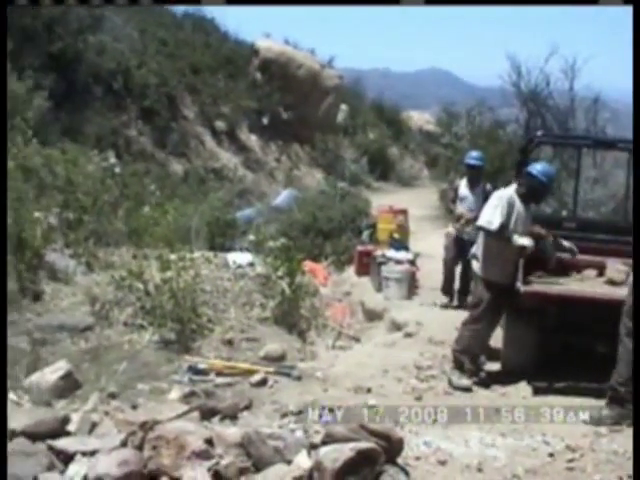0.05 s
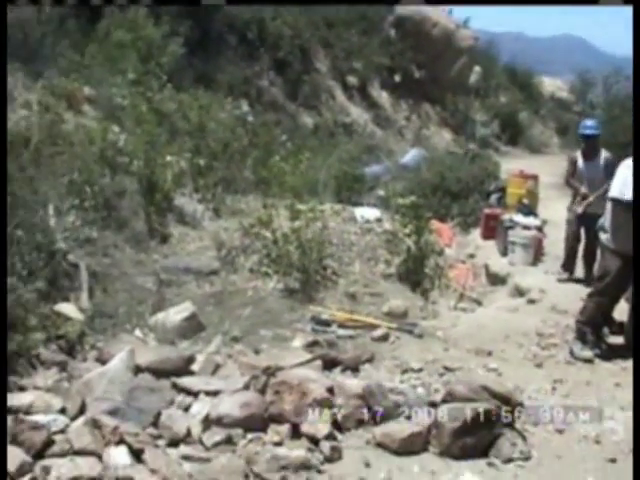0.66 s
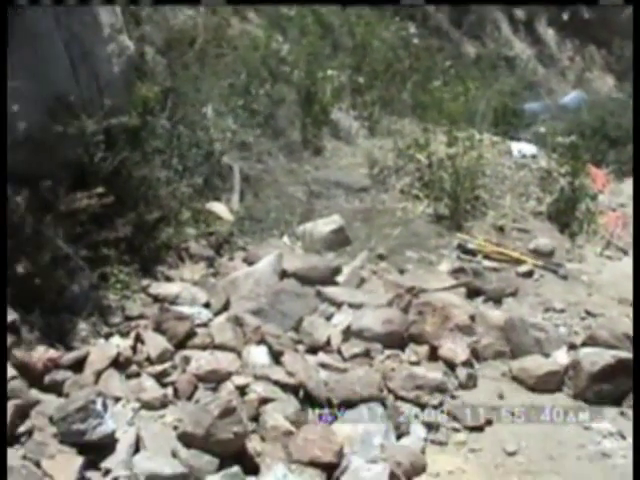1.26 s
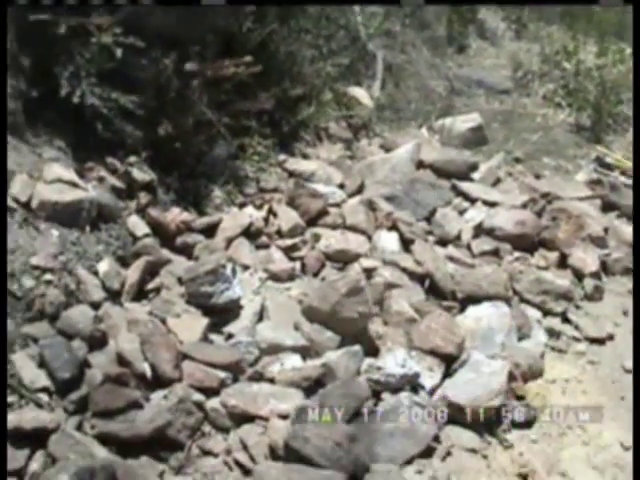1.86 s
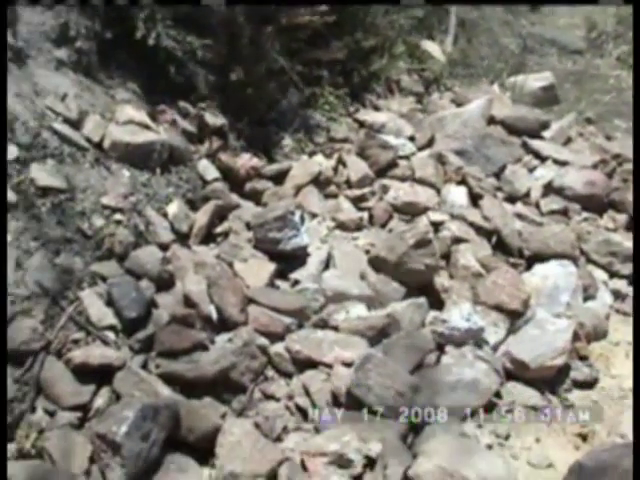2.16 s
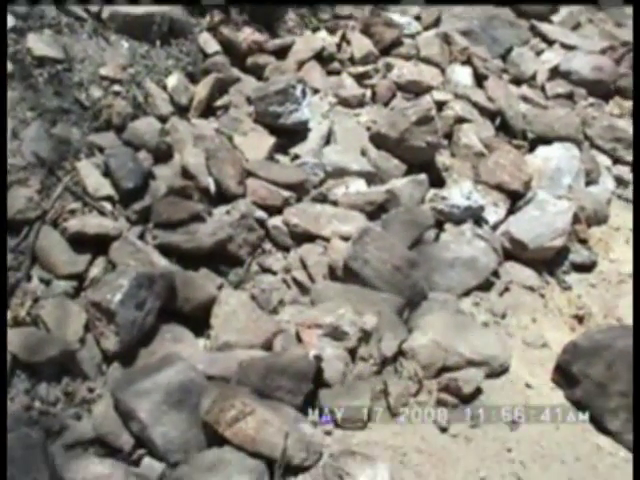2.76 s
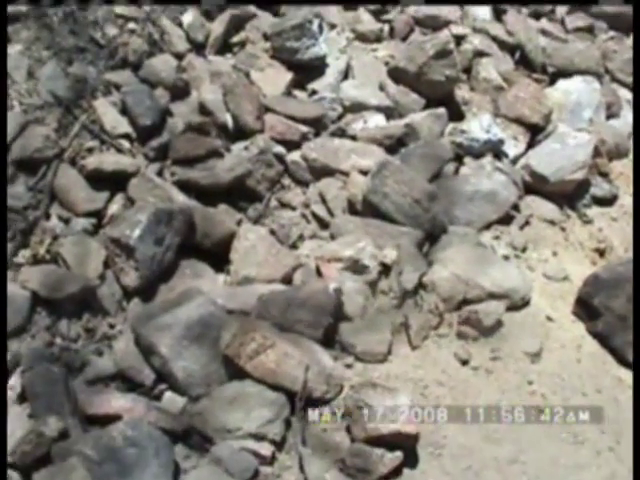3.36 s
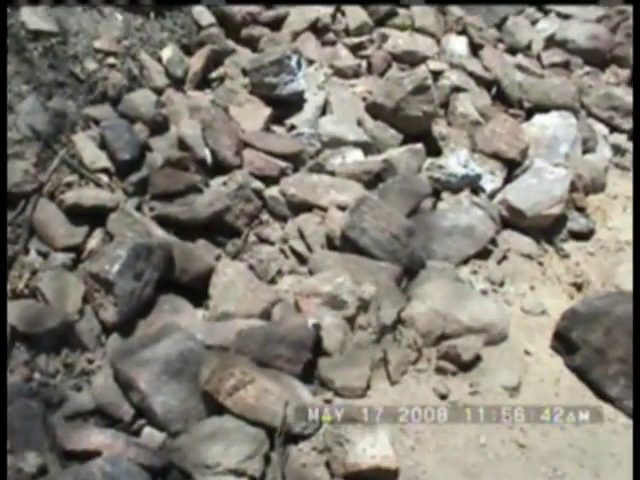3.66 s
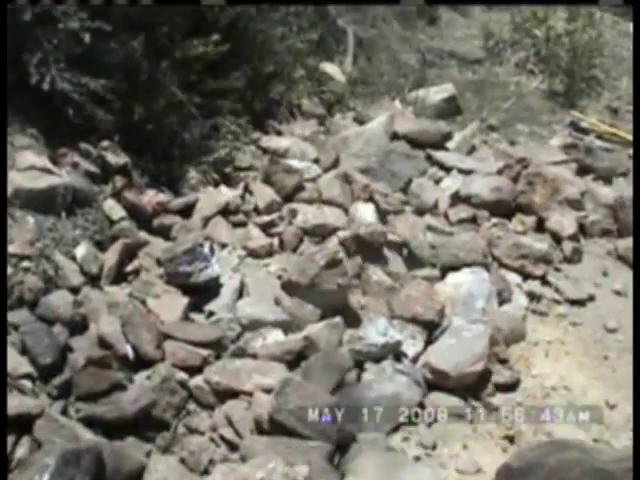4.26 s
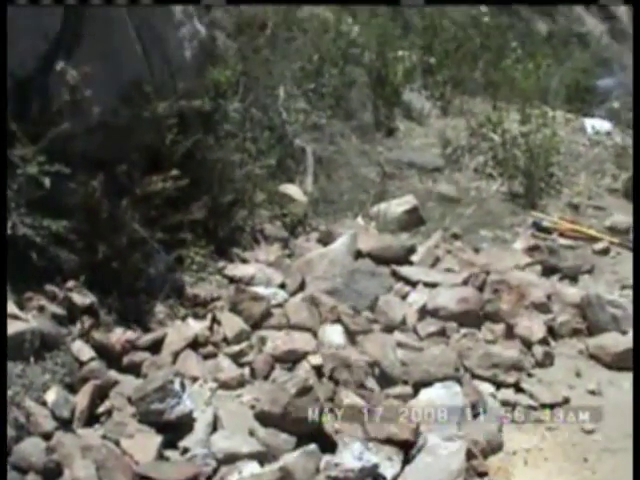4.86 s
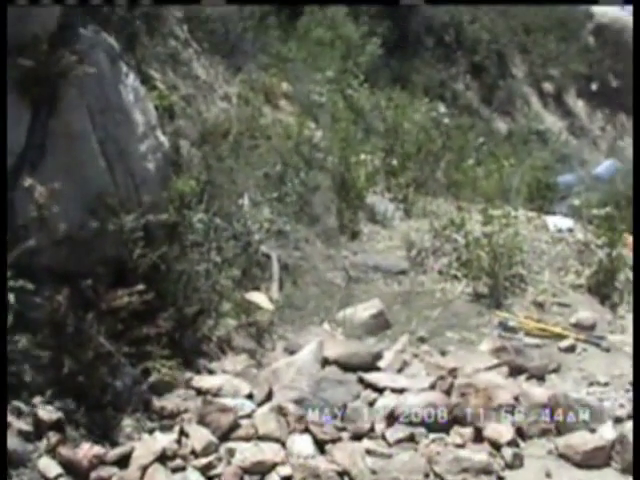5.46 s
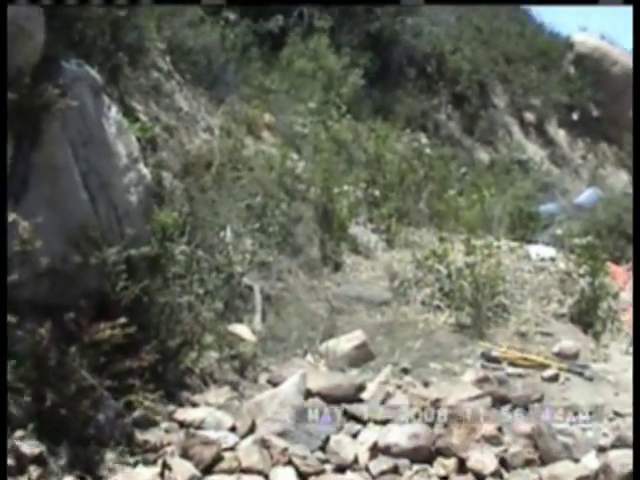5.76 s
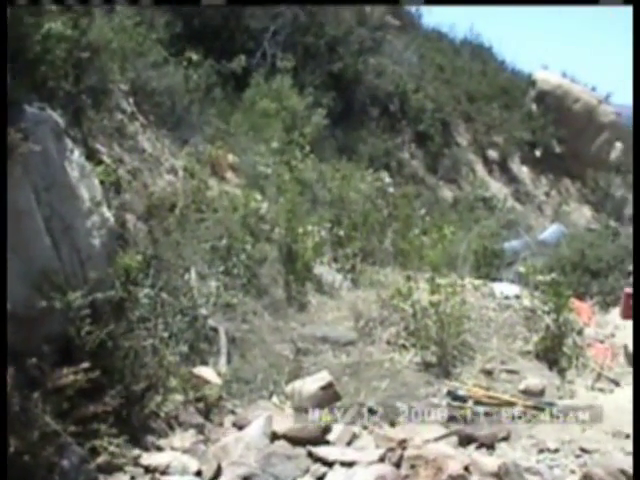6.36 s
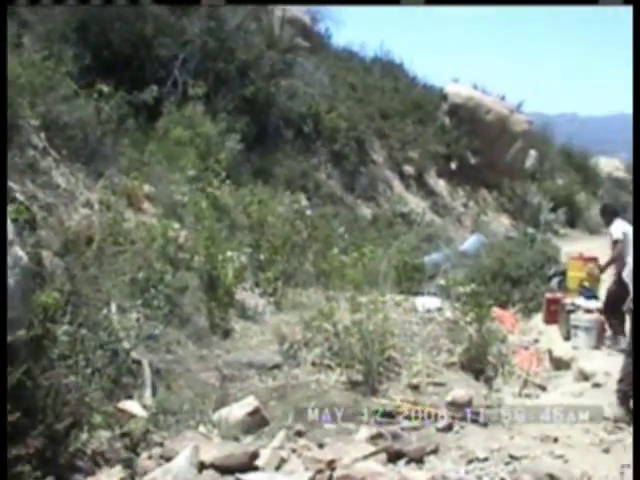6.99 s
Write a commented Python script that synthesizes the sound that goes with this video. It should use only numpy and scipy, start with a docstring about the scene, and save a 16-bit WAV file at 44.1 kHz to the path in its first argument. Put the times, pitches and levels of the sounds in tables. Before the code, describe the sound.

Close to the microphone on a dry trail, tossed stones clatter onto a pile and settle with trickling grit. Boots and heavy rocks scuff and bump in the dirt for a couple of seconds. After a short scrape, stones clack together again in uneven clusters, a few with a brief hollow ring, before softer crunching closes it out. Light wind rumbles on and off.

```python
"""A dry hillside trail, where a crew unloads rocks by hand close to the microphone.
Tossed stones clack on the pile: each impact excites heavily damped modes and cracks the grit.
Heavy rocks and boots thud and scuff in the dirt, and loose stones rub and trickle, their many
tiny contacts summing to noise. A brief hollow ringing follows some bumps and knocks.
Gusts buffet the microphone, faint whistles come and go, and the slope reflects a thin tail."""
import sys
import numpy as np
from scipy import signal
from scipy.fft import rfft, irfft, next_fast_len
from scipy.io import wavfile
from scipy.ndimage import uniform_filter1d

SR = 44100
rng = np.random.default_rng(int(sys.argv[2]) if len(sys.argv) > 2 else 0)


def generate_wav(sig):
    """Save sig (samples, or channels by samples) to the path in sys.argv[1] as 16-bit PCM at SR."""
    pcm = np.round(np.clip(np.atleast_2d(sig).T, -1, 1) * 32767).astype(np.int16)
    wavfile.write(sys.argv[1], SR, pcm)


N = 310023
TIME = np.arange(N) / SR

# Noise spectra. Each row: frequency in Hz, relative spectral density in dB.
AIR_SPECTRUM = [(40, 11), (200, -13), (700, -1), (1500, -5.5), (9000, -15), (13000, -22), (14000, -45)]  # steady hillside air
BUFFET_SPECTRUM = [(15, -34), (35, -7), (70, 1), (140, 1), (240, -5.5), (400, -15), (900, -32), (3000, -77)]  # eddies on the microphone
RUB_SPECTRUM = [(60, -37), (140, -1), (270, 9.5), (450, 6), (650, 6.5), (1400, 3), (2000, -5), (3500, -30),
                (9000, -64)]  # loose stones rubbing
TRICKLE_SPECTRUM = [(1200, 10.5), (2200, 6.5), (5000, 3), (10500, 0), (13000, -11), (14200, -22)]  # grit running between stones
SAND_SPECTRUM = [(3000, 1.5), (6300, -1.5), (7600, 3.5), (8600, -0.5), (10000, -6.5), (13000, -38)]  # crushed sand
CHIP_SPECTRUM = [(2100, 7), (3800, -14), (5200, 3), (7500, -2), (15000, -16)]  # skittering chips
GRIND_SPECTRUM = [(120, -4), (500, -8.5), (1050, -6), (1500, 1), (1900, -4.5), (2500, -11), (8000, -16.5),
                  (15000, -40)]  # rock rasping on rock
GRIT_SPECTRUM = [(700, 14), (1800, 9.5), (3500, 9), (6000, 13.5), (9000, 14), (12500, -2), (16000, -21)]  # crunching gravel
CRACK_SPECTRUM = [(1200, 7.5), (2200, 4), (3600, 0), (7000, -4), (10000, -8.5), (13000, -20.5),
                  (16000, -49)]  # the sharp edge of an impact
# Spectrum of a scuff's dull body. Each row: multiple of its pitch, relative density in dB.
DIRT_SPECTRUM = [(.1, -19.5), (.28, -9), (.4, 2), (.7, -1), (1.0, 2), (1.65, -3), (2.2, -8), (6.0, -27),
                 (14.0, -73)]
# Reverberation of the slope. Each row: frequency in Hz, time to fall 60 dB in seconds.
SLOPE_DECAY = [(200, 0.88), (1000, 0.19), (4000, 0.23), (9000, 0.17), (15000, 0.27)]
# Gusts. Each row: start in seconds, length in seconds, relative level in dB.
GUSTS = [(-.02, 0.088, -27.5), (0.142, 0.14, -29), (1.972, 0.058, -38), (2.904, 0.078, -36.5),
         (3.091, 0.25, -28), (3.346, 0.1, -27.5), (3.959, 0.29, -29.5), (4.31, 0.36, -30.5),
         (4.555, 0.38, -30.5), (4.962, 0.236, -38.5), (5.477, 0.315, -36), (5.853, 0.13, -26),
         (6.501, 0.052, -31), (6.76, 0.066, -25), (6.873, 0.098, -29)]
# A tiny squeak and an airy whistle. Each row: start and length in seconds, pitch and width in Hz,
# level in dB.
WHISTLES = [(2.214, 0.0087, 10500, 463, -40), (5.794, 0.95, 2180, 170, -49)]
# Loose stones sliding. Each row: start and length in seconds, relative rubbing and grit levels in dB.
SLIDES = [(-.03, 0.093, -44, -45), (0.132, 0.4, -65, -43.5), (0.362, 0.36, -45.5, -47.5),
          (1.165, 0.35, -37.5, -46.5), (1.564, 0.21, -35.5, -50.5), (1.82, 0.34, -35, -46),
          (2.196, 0.16, -40, -58), (2.36, 0.25, -34, -54), (2.762, 0.7, -46, -54.5),
          (3.604, 0.091, -43.5, -52), (4.308, 0.11, -34, -43), (4.566, 0.18, -42, -43.5),
          (4.747, 0.17, -58, -47.5), (5.217, 0.093, -40, -39.5), (5.332, 0.017, -22.5, -37.5),
          (5.479, 0.2, -33, -44.5), (5.798, 0.23, -36.5, -49), (6.06, 0.79, -43, -55),
          (6.656, 0.37, -32, -42)]
# Sand yielding under a weight. Each row: start in seconds, level in dB.
CRUNCHES = [(1.22, -36), (1.398, -40), (1.457, -46), (6.791, -39), (6.835, -34.5), (6.905, -36)]
# Low bumps. Each row: start in seconds, envelope peak in dB, pitch in Hz, ring time in seconds.
THUDS = [(0.041, -29, 150, 0.0075), (1.332, -22.5, 263, 0.0031), (2.33, -9.5, 170, 0.0022),
         (2.445, -25, 280, 0.015), (2.582, -19.5, 238, 0.0045), (4.17, -14.5, 212, 0.0024),
         (4.607, -21, 204, 0.0041), (4.879, -18.5, 214, 0.0029), (5.868, -22.5, 205, 0.0092),
         (5.896, -24.5, 130, 0.008), (5.947, -22, 174.5, 0.0098)]
# Rocks and boots landing or dragging in dirt. Each row: start, rise and decay in seconds,
# body level in dB, body pitch in Hz, grit level in dB.
SCUFFS = [(.134, 0.00085, 0.013, -21, 1420, -23.5), (.166, 0.002, 0.044, -24.5, 1520, -28.5),
          (1.115, 0.0092, 0.016, -31, 840, -40.5), (1.214, 0.019, 0.049, -29, 875, -39.5),
          (1.272, 0.016, 0.0068, -22.5, 750, -33.5), (1.661, 0.00074, 0.022, -22.5, 685, -33),
          (1.925, 0.0081, 0.053, -28, 654, -50), (1.976, 0.0044, 0.022, -12, 687, -26.5),
          (2.049, 0.013, 0.011, -25, 553, -40), (2.105, 0.011, 0.013, -18, 920, -30),
          (2.325, 0.0063, 0.0018, -19, 1240, -15.5), (2.392, 0.0049, 0.0092, -30, 1030, -56),
          (2.444, 0.025, 0.04, -25, 525, -38.5), (2.479, 0.0037, 0.11, -40, 590, -27.5),
          (2.553, 0.0031, 0.024, -33, 725, -18.5), (2.579, 0.0023, 0.015, -19, 466, -25.5),
          (2.733, 0.0029, 0.036, -42, 1310, -34), (2.815, 0.0043, 0.02, -36.5, 1040, -44.5),
          (2.972, 0.013, 0.057, -35.5, 1230, -50), (3.326, 0.021, 0.015, -24.5, 360, -73),
          (3.36, 0.0093, 0.028, -28, 386, -57), (4.081, 0.021, 0.011, -21, 315, -76),
          (5.694, 0.0088, 0.046, -28.5, 550, -32), (5.8, 0.0035, 0.11, -26.5, 666, -44),
          (5.843, 0.013, 0.0091, -21, 770, -26), (6.131, 0.006, 0.066, -21.5, 755, -38),
          (6.486, 0.0029, 0.012, -39, 800, -35.5), (6.69, 0.011, 0.045, -27, 660, -47)]
# Single bits of gravel snapping. Each row: start in seconds, level in dB.
SNAPS = [(.019, -28), (.152, -23.5), (2.252, -40), (2.283, -33.5), (2.486, -26.5), (2.535, -25),
         (2.606, -31), (4.2824, -18), (4.451, -25.5), (4.54, -32.5), (4.651, -32.5), (4.677, -36),
         (4.712, -34.5), (4.953, -36.5), (5.489, -24)]
# Brief hollow, low ringing after some bumps and knocks. Each row: start in seconds, level in dB,
# lowest mode in Hz, 60 dB decay in seconds.
HOLLOW_RINGS = [(1.98, -16.5, 247.6, 0.16), (3.534, -18.5, 632, 0.13), (5.411, -21, 423, 0.049),
                (5.802, -25.5, 253.5, 0.33)]
# Modes of the hollow ringing. Each row: multiple of the lowest frequency, relative level in dB.
HOLLOW_MODES = [(1.0, 2), (2.51, 0.5), (9.3, -24)]
# Hard stones clinking. Each row: start in seconds, level in dB, pitch in Hz, 60 dB decay in seconds.
CLINKS = [(.134, -11.5, 5500, 0.015), (0.248, -13, 4680, 0.01), (.2487, -10, 2900, 0.0094),
          (3.533, -10.5, 6540, 0.013), (3.534, -20, 1720, .03), (3.689, -41, 1700, 0.31),
          (4.3038, -11, 1920, .016), (4.909, -15, 1365, 0.027), (4.961, -16.5, 1340, 0.025),
          (5.238, -8, 6730, 0.016)]
# Stone striking stone. Each row: start in seconds, knock peak in dB, pitch in Hz, crack level in dB.
CLACKS = [(0.1333, -1.5, 1110, -12.5), (0.1421, -5.5, 1270, -21), (.17, -6, 1600, -14),
          (.184, -14, 1500, -22.5), (0.197, -9.5, 1080, -26), (0.207, -10, 915, -21.5),
          (0.2483, 1.5, 1224, -22.5), (0.2925, -15.5, 684, -28), (0.384, -8.5, 1007, -31),
          (0.466, -3.5, 1880, -18.5), (.466, -3, 1075, -15.5), (0.534, -19.5, 910, -29.5),
          (0.5988, -17, 1156, -28.5), (.645, -22.5, 845, -28), (0.9265, -15.5, 924, -34),
          (1.017, -16.5, 1650, -34.5), (1.112, -16, 1010, -37), (2.702, -26.5, 1490, -30.5),
          (3.533, -3, 1690, -19), (3.5614, 2.5, 1360, -27), (3.6388, -20.5, 680, -36),
          (3.6896, -26, 670, -37), (4.0998, -24, 705, -86), (4.286, -9.5, 1040, -14),
          (4.3038, -3, 1380, -19), (4.322, -11.5, 600, -15.5), (4.3385, -0.5, 1260, -15),
          (4.4453, -17, 770, -23), (4.5657, -5.5, 1400, -22), (4.566, -6.5, 663, -19.5),
          (4.6688, -17.5, 715, -27), (4.724, -19.5, 605, -28.5), (4.805, -12, 1260, -35),
          (4.909, -11, 1295, -42), (4.9608, -11.5, 1300, -30), (5.103, -24, 1420, -38.5),
          (5.238, -14.5, 1124, -16), (5.275, -13, 2340, -27.5), (5.4, -8, 1140, -17),
          (5.4027, 2, 1235, -20.5), (5.4076, -10, 950, -28), (5.4109, -5.5, 1120, -43),
          (5.4944, -9, 1030, -53), (5.5599, -10, 1140, -23.5), (5.734, -16, 2200, -17.5),
          (5.756, -3.5, 2300, -29), (5.944, -11, 1390, -33.5), (6.634, -21, 870, -42)]
# Modes of a stone and the gaps around it. Each row: multiple of the knock pitch, relative level in dB,
# factor on the ring time.
STONE_MODES = [(.27, -12.5, 1.54), (.57, -11, 1.82), (1.0, 2, 1.09), (1.9, -16, 1.03)]


def amp(db):
    """Amplitude grows tenfold for every 20 dB."""
    return 10 ** (np.asarray(db) / 20)


def unit_rms(x):
    """Division by the rms gives a signal unit power."""
    return x / np.sqrt(np.mean(x ** 2) + 1e-20)


def curve_at(points, hz):
    """Interpolation on a log-frequency axis reads a curve between its points."""
    point_hz, values = np.transpose(points)
    return np.interp(np.log(hz + 1e-6), np.log(point_hz), values)


def add(mix, start, sound):
    """Superposition: a sound adds to the mix from its start in seconds."""
    part = mix[max(round(start * SR), 0):][:len(sound)]
    part += sound[:len(part)]


def colour(x, spectrum, pitch=1):
    """Filtering imposes a spectrum, shifted by pitch and rolled off below its first point, at rms 1."""
    size = next_fast_len(len(x))
    hz = np.fft.rfftfreq(size, 1 / SR) / pitch
    gain = amp(curve_at(spectrum, hz)) * np.minimum(hz / spectrum[0][0], 1) ** 2
    return unit_rms(irfft(rfft(x, size) * gain, size)[:len(x)])


def shaped(x, envelope):
    """Amplitude modulation, scaled so that the result has the energy of the envelope."""
    return x * envelope * np.linalg.norm(envelope) / np.linalg.norm(x * envelope)


def swell(start, length_s, rise_s, fade_s, t=TIME):
    """An envelope rises linearly, holds to the end of its length and decays exponentially."""
    return np.clip((t - start) / rise_s, 0, 1) * np.exp(-np.maximum(t - start - length_s, 0) / fade_s)


def pulse(t, peak_s):
    """A critically damped response rises to 1 and dies away."""
    return t / peak_s * np.exp(1 - t / peak_s)


def ring(t, hz, ring_s, order):
    """A heavily damped mode peaks at ring_s and soon dies; a higher order starts more gently."""
    return pulse(t, ring_s) ** order * np.sin(2 * np.pi * hz * t)


def flutter(t, per_s, depth_db):
    """Random modulation: a gain wanders between normally distributed levels."""
    knots = np.arange(0, t[-1] + 1, 1 / per_s)
    return amp(depth_db * np.interp(t, knots, rng.standard_normal(4096)[:len(knots)]))


def grains(count, per_s, spread_db, hiss):
    """Shot noise: independent impulses of uneven size, over a smooth hiss."""
    size = amp(spread_db * np.minimum(rng.exponential(1, count), 4))
    polarity = np.sign(rng.standard_normal(count))
    occurs = rng.random(count) < per_s / SR
    return unit_rms(polarity * size * occurs) + hiss * rng.standard_normal(count)


def patchy(x, depth_db=3.5):
    """Grain size sets timbre, so the spectrum of mixed gravel shifts from moment to moment."""
    frames = signal.stft(x, nperseg=256)[2]
    patches = uniform_filter1d(rng.standard_normal(frames.shape), size=5, axis=0)
    patches = unit_rms(uniform_filter1d(patches, size=4, axis=1))
    return unit_rms(signal.istft(frames * amp(depth_db * patches), nperseg=256)[1][:len(x)])


def bounce(x, share_db):
    """Reflection from the hard ground sends a copy a few milliseconds behind the direct sound."""
    lag = round(rng.uniform(0.0033, .0058) * SR)
    return x + amp(share_db) * np.pad(x, (lag, 0))[:len(x)]


def scatter(x, share_db, decay_s):
    """Scattering from nearby surfaces adds a quick spray of echoes."""
    t = np.arange(len(x)) / SR
    echoes = rng.standard_normal(len(t)) * np.exp(-t / decay_s) * (t > .0025)
    return x + amp(share_db) * signal.fftconvolve(x, echoes / np.linalg.norm(echoes))[:len(x)]


def slope(x, rise_s=0.012):
    """Diffuse reflection from brush and rock faces returns a tail whose lows last longest."""
    hz, t, frames = signal.stft(rng.standard_normal(SR), SR, nperseg=256)
    decay = amp(-60 * t / curve_at(SLOPE_DECAY, hz)[:, None])
    tail = signal.istft(frames * decay, SR, nperseg=256)[1]
    tail *= np.minimum(np.arange(len(tail)) / SR / rise_s, 1)
    return signal.fftconvolve(x, tail / np.linalg.norm(tail))[:N]


def wind(air_db=-50):
    """Turbulence: eddies press on the microphone one by one, over faint steady air."""
    eddies = colour(grains(N, per_s=130, spread_db=1.5, hiss=0.86), BUFFET_SPECTRUM)
    local_power = uniform_filter1d(eddies ** 2, SR // 20) + 1e-6
    eddies = unit_rms(eddies / local_power ** (1 / 3))  # eddies within a gust are alike in strength
    breeze_power = amp(-49) ** 2
    gust_power = sum((amp(db) * swell(start, length_s, rise_s=0.045, fade_s=0.031)) ** 2
                     for start, length_s, db in GUSTS)
    air = amp(air_db) * colour(rng.standard_normal(N), AIR_SPECTRUM)
    return amp(-2.5) * eddies * np.sqrt(breeze_power + gust_power) + air


def whistles():
    """Narrow-band noise is heard as a fuzzy tone; each one swells and fades."""
    out = np.zeros(N)
    for start, length_s, hz, width_hz, db in WHISTLES:
        t = np.arange(0, length_s, 1 / SR)
        band = np.exp(-((np.fft.rfftfreq(N, 1 / SR) - hz) / width_hz) ** 2)
        tone = irfft(rfft(rng.standard_normal(N)) * band, N)[:len(t)]
        tone = unit_rms(tone * flutter(t, per_s=14.2, depth_db=3.0))
        add(out, start, amp(db) * tone * np.sin(np.pi * t / length_s) ** .5)
    return out


def debris(start=0.11, db=-42.0):
    """Many small collisions merge into a hiss as chips skitter down after the first rocks land."""
    chips = colour(grains(N, per_s=900, spread_db=4.5, hiss=.5), CHIP_SPECTRUM)
    chips = unit_rms(chips * flutter(TIME, per_s=110, depth_db=4.5))
    return amp(db) * chips * swell(start, length_s=0.46, rise_s=0.052, fade_s=0.21)


def pebbles(decay_s=0.0061):
    """A Poisson process: stray pebbles tick independently, each with a brief crack."""
    t = np.arange(SR // 50) / SR
    hits = abs(grains(N, per_s=60, spread_db=4.0, hiss=0))
    ticks = signal.oaconvolve(hits, np.exp(-t / decay_s))[:N]
    return colour(ticks * rng.standard_normal(N), CRACK_SPECTRUM)


def unrest(settle_s=0.22):
    """Dissipation: each knock gives the pile energy that drains away; its root is the amplitude."""
    energy = np.zeros(N)
    for start, knock_db, *_ in CLACKS:
        add(energy, start, amp([knock_db]) ** 2)
    return np.sqrt(signal.lfilter([1], [1, -np.exp(-2 / (settle_s * SR))], energy))


def shifting_pile():
    """Friction makes stones rub in fits and starts while grit trickles between them in clumps."""
    rub = colour(grains(N, per_s=900, spread_db=3.0, hiss=1.0), RUB_SPECTRUM)
    rub *= flutter(TIME, per_s=35, depth_db=3.8)
    trickle = 0
    for pitch in (.9, 1.0):  # coarse and fine grit come and go on their own
        stream = colour(grains(N, per_s=2000, spread_db=4.2, hiss=1.0), TRICKLE_SPECTRUM, pitch)
        trickle += stream * flutter(TIME, per_s=87, depth_db=5.0)
    sand = colour(grains(N, per_s=900, spread_db=5.0, hiss=0.5), SAND_SPECTRUM)
    sand *= flutter(TIME, per_s=120, depth_db=4.5)
    slide_rub = slide_grit = 0
    for start, length_s, rub_db, grit_db in SLIDES:
        motion = swell(start, length_s, rise_s=0.052, fade_s=0.053)
        slide_rub = np.hypot(slide_rub, amp(rub_db) * motion)
        slide_grit = np.hypot(slide_grit, amp(grit_db) * motion)
    # Sliding, settling after knocks and a constant faint stir add in power.
    settling = unrest()
    rub_gain = np.hypot(slide_rub, np.hypot(amp(-57) * settling, amp(-50)))
    grit_gain = np.hypot(slide_grit, np.hypot(amp(-49.5) * settling, amp(-67.5)))
    grit = amp(1.0) * patchy(trickle) + amp(-10) * pebbles()
    return unit_rms(rub) * rub_gain + grit * grit_gain + amp(-4) * patchy(sand) * slide_grit


def crunches():
    """Sand yields under a shifting load in soft puffs of noise."""
    out, t = np.zeros(N), np.arange(SR // 10) / SR
    for start, db in CRUNCHES:
        sand = patchy(colour(rng.standard_normal(len(t)), SAND_SPECTRUM))
        add(out, start, amp(db) * sand * pulse(t, peak_s=0.0071))
    return out


def thuds():
    """Heavy damping leaves only a brief low bump, as of a weight meeting the ground or a dull buffet of wind."""
    out, t = np.zeros(N), np.arange(SR // 5) / SR
    for start, db, hz, ring_s in THUDS:
        add(out, start, amp(db) * ring(t, hz, ring_s, order=1))
    return out


def grind(start=3.156, rise_s=0.024, decay_s=0.047, db=-16.0):
    """Sliding friction: one rock rasps hard across another and stops."""
    out, t = np.zeros(N), np.arange(SR // 3) / SR
    press = swell(0, rise_s, rise_s, decay_s, t)
    rasp = patchy(colour(grains(len(t), per_s=3800, spread_db=1.0, hiss=1.0), GRIND_SPECTRUM))
    add(out, start, amp(db) * press * bounce(rasp, share_db=-10.5))
    return out


def scuffs(normal_grit_db=-33.5):
    """Compaction: a weight presses into the dirt with a dull rush, and gravel gives way in clumps."""
    out, t = np.zeros(N), np.arange(SR // 3) / SR
    for start, rise_s, decay_s, body_db, hz, grit_db in SCUFFS:
        press = swell(0, rise_s, rise_s, decay_s, t)
        body = colour(grains(len(t), per_s=1600, spread_db=-2.5, hiss=0.18), DIRT_SPECTRUM, hz)
        pitch = amp(0.047 * (grit_db - normal_grit_db))  # harder crushing makes finer, brighter grit
        grit = colour(grains(len(t), per_s=1700, spread_db=4.5, hiss=0.4), GRIT_SPECTRUM, pitch)
        grit = patchy(grit) * flutter(t, per_s=208, depth_db=3.0)
        scuff = amp(body_db) * shaped(body, press) + amp(grit_db) * shaped(grit, press ** 1.32)
        add(out, start, bounce(scuff, share_db=-8.5))
    return out


def snaps():
    """Brittle fracture: a bit of gravel gives way in a burst of tiny cracks."""
    out, t = np.zeros(N), np.arange(SR // 20) / SR
    for start, db in SNAPS:
        burst = colour(grains(len(t), per_s=2500, spread_db=4, hiss=.5), GRIT_SPECTRUM, pitch=1.11)
        add(out, start, amp(db) * shaped(patchy(burst), np.sqrt(pulse(t, peak_s=0.0021))))
    return out


def hollow_rings(rise_s=0.0028):
    """Resonance: a few decaying modes give a brief hollow, low ringing after some bumps and knocks."""
    out, t = np.zeros(N), np.arange(SR // 4) / SR
    for start, db, hz, t60 in HOLLOW_RINGS:
        modes = sum(amp(mode_db) * np.sin(2 * np.pi * hz * ratio * t) for ratio, mode_db in HOLLOW_MODES)
        envelope = (1 - np.exp(-t / rise_s)) * amp(db - 60 * t / t60)
        add(out, start, scatter(modes * envelope, share_db=-42, decay_s=0.018))
    return out


def clinks(count=9):
    """Beating: the closely spaced modes of a hard stone interfere as they die."""
    out, t = np.zeros(N), np.arange(SR // 2) / SR
    for start, db, hz, t60 in CLINKS:
        half_width_hz = 27.9 * (hz / 1000) ** 2
        offsets = 2 * (np.arange(count) + rng.random(count)) / count - 1
        cycles = np.outer(t, hz + half_width_hz * offsets) + rng.random(count)
        cluster = np.sin(2 * np.pi * cycles).sum(1)
        envelope = np.minimum(t * hz / 2, 1) * amp(-60 * t / t60)
        add(out, start, amp(db) * shaped(cluster, envelope))
    return out


def clacks():
    """Impact excitation: each contact cracks the grit and drives damped modes in a hollow knock."""
    out, t = np.zeros(N), np.arange(SR // 10) / SR
    crush = (1 - np.exp(-t / 0.000043)) * (np.exp(-t / 0.0013) + amp(-30.0) * np.exp(-t / 0.017))
    for start, knock_db, hz, crack_db in CLACKS:
        ring_s = 1.014 / hz * amp(-0.083 * knock_db)  # about one cycle, longer for a soft knock
        knock = sum((-1) ** k * amp(db) * ring(t, hz * ratio, ring_s * hold, order=2)
                    for k, (ratio, db, hold) in enumerate(STONE_MODES))
        crack = colour(rng.standard_normal(len(t)), CRACK_SPECTRUM) * crush
        blow = amp(knock_db) * knock / abs(knock).max() + amp(crack_db) * crack / crack[t < .0035].std()
        add(out, start, scatter(bounce(blow, share_db=-12.5), share_db=-7.0, decay_s=0.0049))
    return out


def scene():
    """Pressures from all sources add at one microphone, the same in both channels."""
    blows = clacks() + clinks() + snaps() + hollow_rings() + scuffs() + grind() + thuds()
    tail = amp(-14.5) * slope(blows)
    mono = blows + tail + shifting_pile() + crunches() + debris() + whistles() + wind()
    return np.array([mono, mono])


def record(dry):
    """Saturation rounds the hardest knocks near full scale; a low-pass filter limits the band."""
    ceiling, cutoff_hz = .95, 16000
    rounded = dry / (1 + (dry / ceiling) ** 6) ** (1 / 6)
    lowpass = signal.firwin(255, cutoff_hz, window=("kaiser", 9), fs=SR)
    return signal.oaconvolve(rounded, lowpass[None], "same")


dry = scene()
out = record(dry)
generate_wav(out)
```